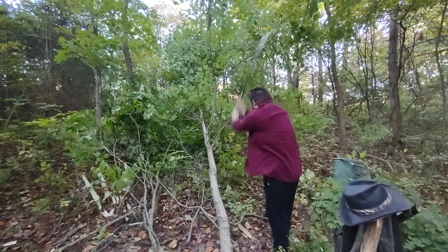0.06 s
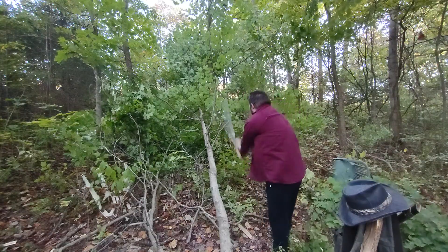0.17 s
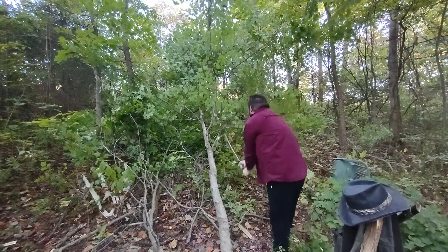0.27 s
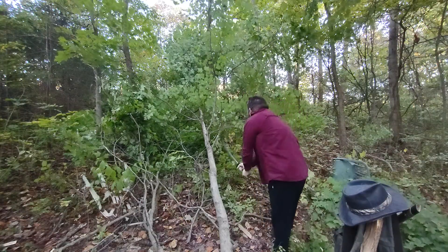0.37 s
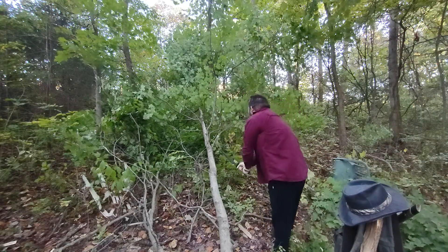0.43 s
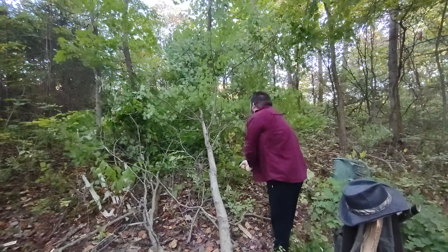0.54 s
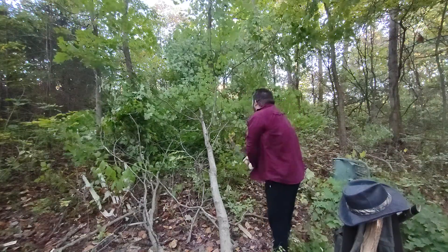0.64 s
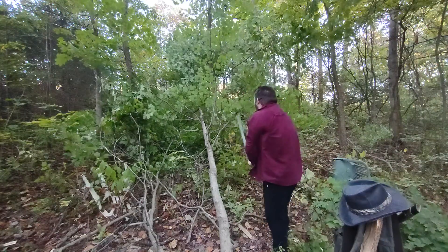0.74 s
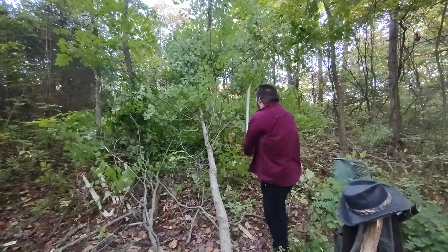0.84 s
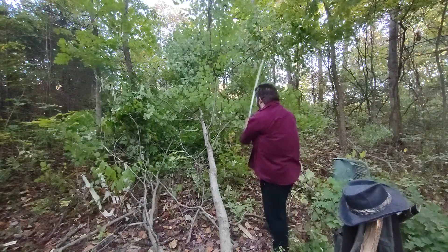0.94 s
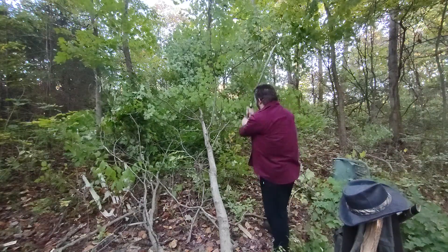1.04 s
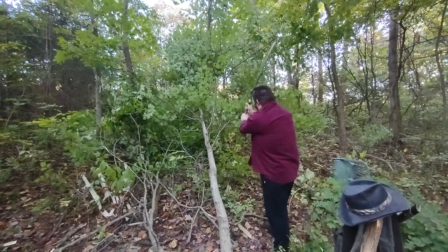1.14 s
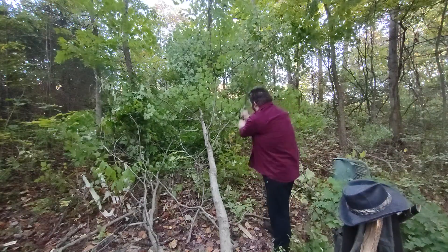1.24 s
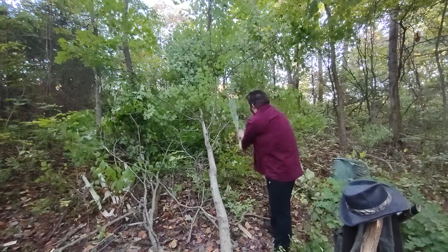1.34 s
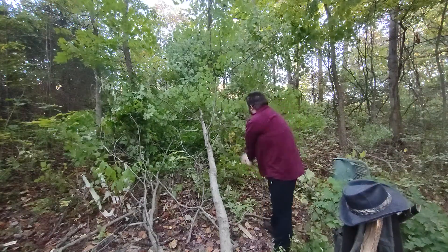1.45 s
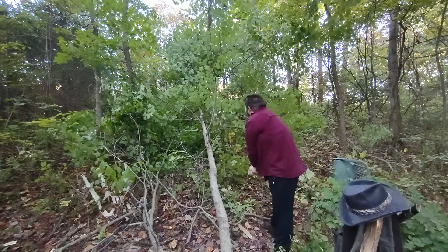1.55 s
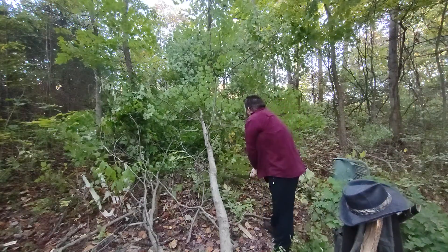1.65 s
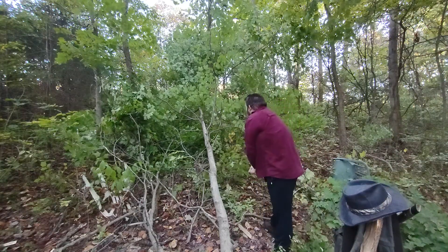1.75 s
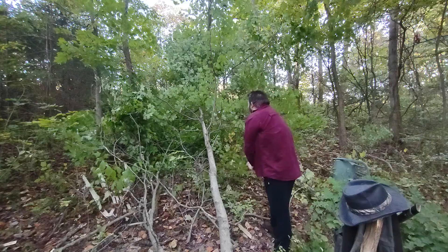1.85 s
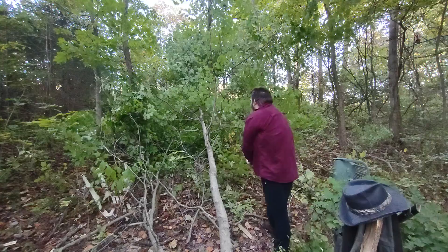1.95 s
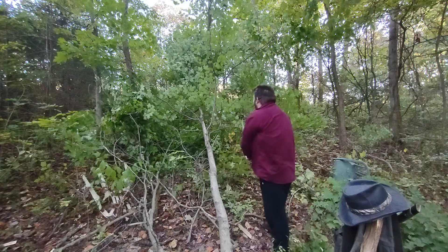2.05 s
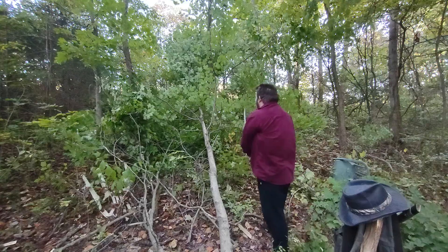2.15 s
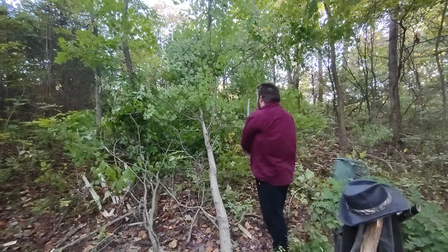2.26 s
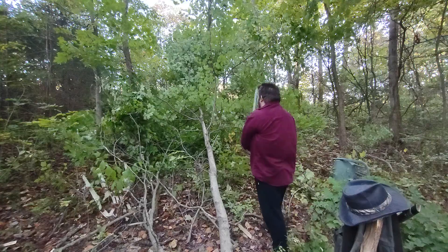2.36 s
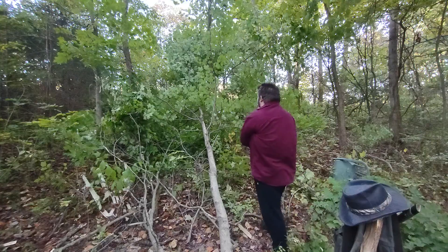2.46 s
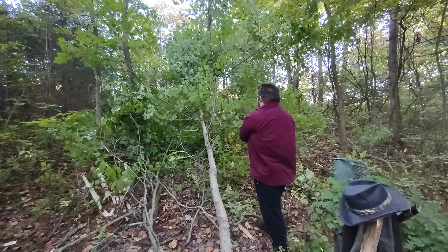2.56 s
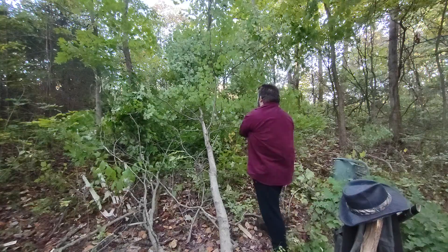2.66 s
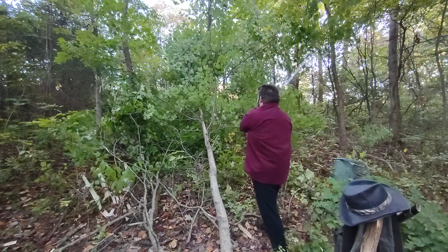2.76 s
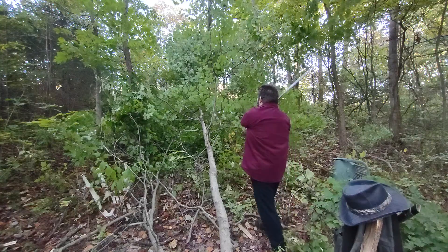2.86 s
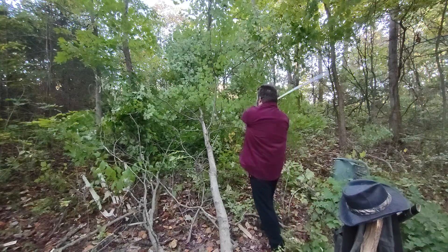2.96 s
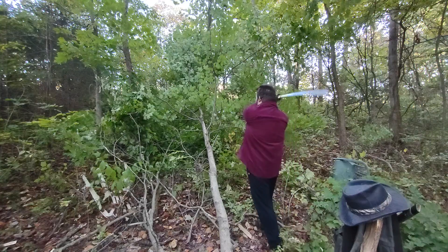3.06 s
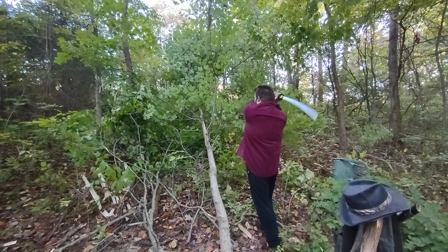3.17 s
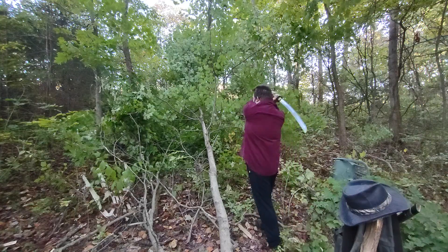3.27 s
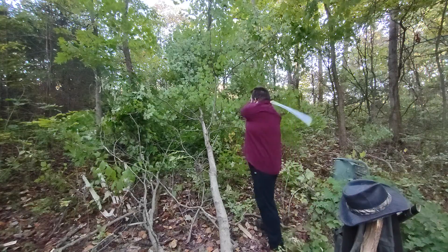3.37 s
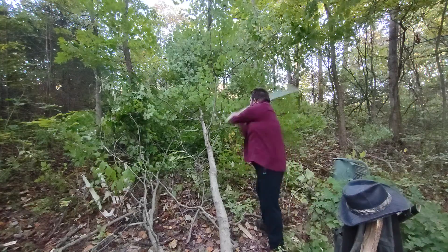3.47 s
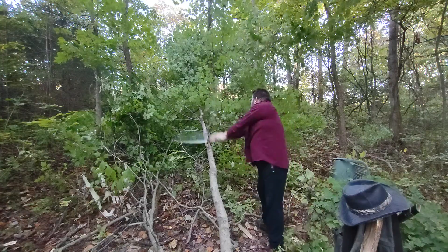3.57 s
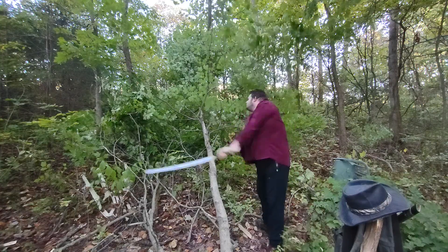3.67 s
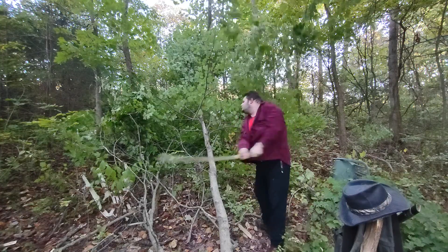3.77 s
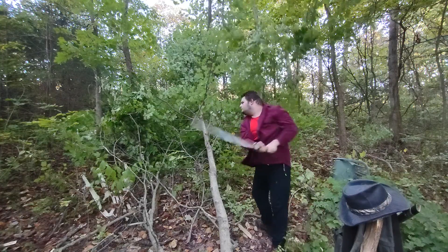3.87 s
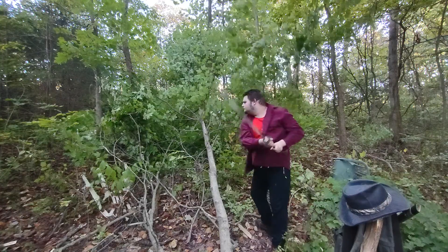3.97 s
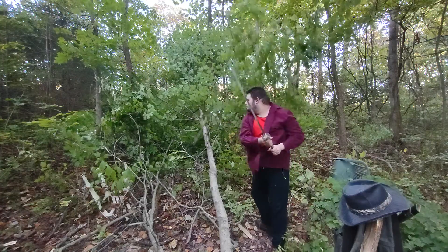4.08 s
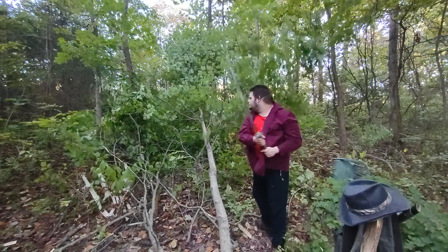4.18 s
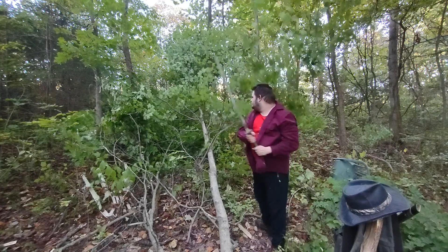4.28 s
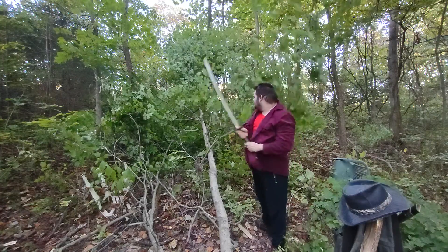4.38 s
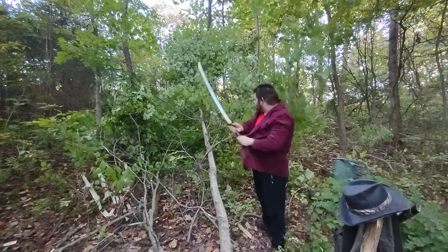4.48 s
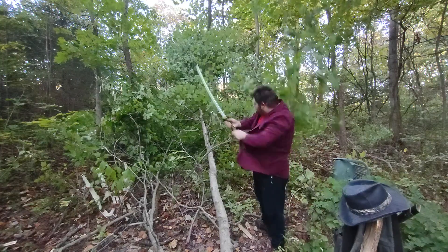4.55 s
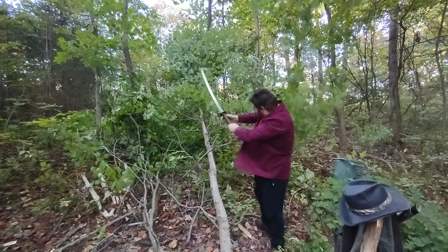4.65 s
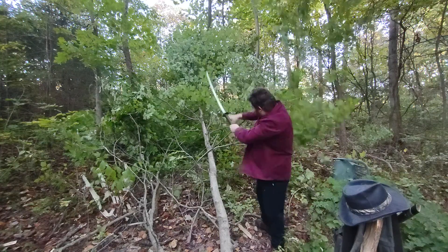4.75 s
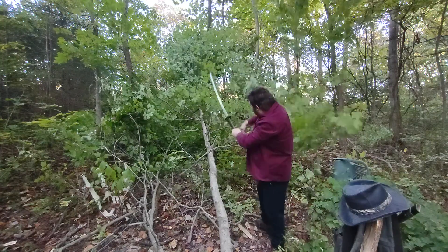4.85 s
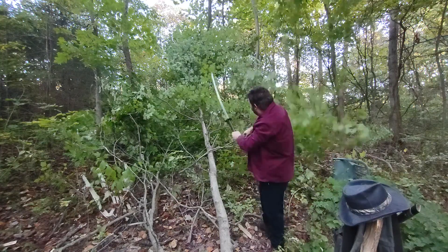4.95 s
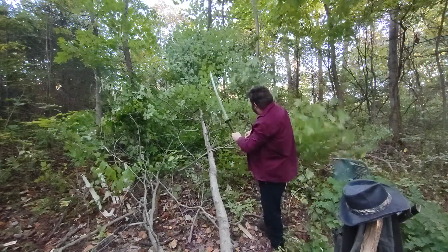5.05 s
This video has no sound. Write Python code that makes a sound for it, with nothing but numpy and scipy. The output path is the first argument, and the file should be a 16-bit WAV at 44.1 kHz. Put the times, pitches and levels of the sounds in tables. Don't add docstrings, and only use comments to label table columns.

```python
import sys
import numpy as np
from scipy import signal
from scipy.fft import rfft, irfft, next_fast_len
from scipy.io import wavfile
from scipy.ndimage import uniform_filter1d, map_coordinates

SR = 44100
rng = np.random.default_rng(int(sys.argv[2]) if len(sys.argv) > 2 else 0)


def gain_from_db(level_db):
    decades = np.asarray(level_db, float) / 20
    return 10 ** decades


def dump(signal):
    limited = np.clip(np.atleast_2d(signal).T, -1, 1)
    pcm = np.round(limited * 32767).astype(np.int16)
    wavfile.write(sys.argv[1], SR, pcm)


N = 225563


def unit(x):
    return x / np.sqrt(np.mean(x ** 2) + 1e-20)


def peak(x):
    return x / np.abs(x).max()


def along(points, hz):
    f, v = np.transpose(points)
    return np.interp(np.log(hz + 1), np.log(f + 1), v)


def curves(rows):
    s, *cols = np.transpose(rows)
    return [np.interp(np.arange(N) / SR, s, c) for c in cols]


def gate(rows, fade):
    first, last = rows[0][0], rows[-1][0]
    return np.interp(np.arange(N) / SR, [first - fade, first, last, last + fade], [0, 1, 1, 0])


def wobble(rate):
    knots = rng.standard_normal(int(N * rate / SR) + 4)
    return map_coordinates(knots, [np.arange(N) * rate / SR])


def filtered(x, response):
    m = next_fast_len(x.shape[-1] + 8192)
    spectrum = rfft(x, m) * response(np.fft.rfftfreq(m, 1 / SR))
    return irfft(spectrum, m)[..., :x.shape[-1]]


def spread(pair, alike, spectrum=((1, 0), (2, 0))):
    turn = lambda hz: np.arccos(np.clip(along(alike, hz), -1, 1)) / 2
    mid, side = filtered(pair, lambda hz: gain_from_db(along(spectrum, hz)) * [np.cos(turn(hz)), np.sin(turn(hz))])
    return np.array([mid + side, mid - side])


def add(track, s, sound):
    part = track[..., round(s * SR):][..., :sound.shape[-1]]
    part += sound[..., :part.shape[-1]]


def modes(table, luck_db):
    luck = rng.normal(0, luck_db, len(table))
    return lambda f: sum(gain_from_db(g + k) * 1j * f * w / (c * c - f * f + 1j * f * w) for k, (c, w, g) in zip(luck, table))


def narrow(hz, width_hz, share=1):
    turning = 2 * np.pi * np.cumsum(hz * np.ones(N)) / SR
    line = lambda: wobble(width_hz) * np.cos(turning) + wobble(width_hz) * np.sin(turning)
    pair = share * np.array([line(), line()])
    return unit(pair) * np.sqrt(np.mean(share ** 2))


def steady(hz, drift_hz, swell_db, rate):
    turning = 2 * np.pi * np.cumsum(hz + drift_hz * wobble(rate)) / SR
    return np.sqrt(2) * gain_from_db(swell_db * wobble(rate)) * np.sin(turning)


# [pitch_hz, likeness (-1 to 1)]
NEAR_LIKENESS = [(60, 0.77), (180, 0.68), (550, 0.92), (1650, 0.99), (4970, 0.27), (15000, -.3)]


def glide(rows, fade, width_hz):
    hz, level_db = curves(rows)
    return gain_from_db(level_db) * spread(narrow(hz, width_hz, gate(rows, fade)), NEAR_LIKENESS)


# [pitch_hz, likeness (-1 to 1)]
FAR_LIKENESS = [(60, 0.83), (240, 0.99), (950, -1), (3770, -0.04), (15000, 0.21)]
# [pitch_hz, level_db]
AIR_COLOUR = [(15, -43.5), (25, -13), (102, 2.5), (200, -9.5), (677, -10), (911, -13), (1040, -14),
              (2220, -12.5), (2480, -13.5), (3820, -15.5), (5140, -17.5), (14800, -29), (16000, -25)]
# [time_s, level_db]
ENGINE_LOW = [(0, -90), (.5, -76), (1.0, -73), (1.45, -69), (2.0, -72), (2.6, -74), (3.1, -73), (3.4, -82),
              (4.0, -70), (5.11, -71)]
# [time_s, level_db]
ENGINE_HIGH = [(0, -95), (.8, -86), (1.2, -77), (2.2, -77), (2.7, -75), (3.45, -76), (3.6, -86), (4.1, -73),
               (5.11, -72)]


def air():
    hiss = unit(spread(rng.standard_normal((2, N)), FAR_LIKENESS, AIR_COLOUR))
    hiss = gain_from_db(-71.1 + .8 * wobble(7.3)) * hiss
    low = steady(84, drift_hz=4, swell_db=1.5, rate=9) + gain_from_db(-9) * narrow(84, width_hz=20)
    high = steady(128, drift_hz=4, swell_db=2.5, rate=9) * np.array([[1], [.4]])
    high = high + gain_from_db(-7) * narrow(128, width_hz=20)
    return hiss + gain_from_db(curves(ENGINE_LOW)[0]) * low + gain_from_db(curves(ENGINE_HIGH)[0]) * high


# [start_s, length_s, first pitch_hz, level_db, gain through the call_db]
BIRD_CALLS = [
    (1.38, .2, 3330, -78, 12),
    (2.89, .43, 3390, -76.5, -6),
]


def bird():
    fall_hz, edge_db = 140, -8
    share, edge = np.transpose([(0, edge_db), (.2, 0), (.8, 0), (1, edge_db)])
    out = 0
    for s, length, hz, db, gain_db in BIRD_CALLS:
        level = db + edge + gain_db * (share - .5)
        rows = np.transpose([s + length * share, hz - fall_hz * share, level])
        pitch, level_db = curves(rows)
        clear = gate(rows, .03) * gain_from_db(level_db) * steady(pitch, drift_hz=25, swell_db=4.5, rate=60)
        out = out + clear + gain_from_db(-1) * glide(rows, .03, width_hz=260)
    return out


# [pitch_hz, time to fade 60 dB_s]
TRUNK_ECHO = [(300, 0.42), (2000, 0.39), (10000, .3)]


def trees(x):
    hz, t, z = signal.stft(rng.standard_normal((2, SR // 2)), SR, nperseg=256)
    tail = signal.istft(z * gain_from_db(-60 * t / along(TRUNK_ECHO, hz)[:, None]), SR, nperseg=256)[1]
    late = np.pad(x, ((0, 0), (300, 0)))
    return signal.fftconvolve(late, tail / np.linalg.norm(tail[0]), axes=1)[:, :N]


def crackle(per_s, scatter_db, life_s, patchy_db):
    size = (rng.random(N) < per_s / SR) * gain_from_db(scatter_db * np.clip(rng.exponential(size=N), 0, 2.5))
    flare = 1 + signal.fftconvolve(size, np.exp(-np.arange(800) / SR / life_s))[:N]
    z = signal.stft(flare * rng.standard_normal((2, N)), nperseg=256)[2]
    field = uniform_filter1d(rng.standard_normal(z.shape[1:]), size=5, axis=0)
    field = uniform_filter1d(field, size=12, axis=1)
    return signal.istft(z * gain_from_db(patchy_db * unit(field)), nperseg=256)[1][:, :N]


# [pitch_hz, likeness (-1 to 1)]
WIDE_LIKENESS = [(60, 0.42), (180, 0.18), (550, 0.23), (1650, 0.048), (4970, 0.044), (15000, 0.01)]
# [time_s, level_db]
SHOWER_LEVEL = [(4.2, -68), (4.31, -59), (4.39, -60), (4.46, -51), (4.49, -53), (4.555, -49.5), (4.59, -52),
                (4.603, -46), (4.625, -53), (4.68, -54), (4.715, -59), (4.8, -58.5), (4.87, -59),
                (4.92, -68), (5.0, -55), (5.03, -56), (5.11, -62)]
# [pitch_hz, level per Hz_db]
DRY_LEAF_COLOUR = [(6300, -120), (7500, -12), (8300, -1), (10000, -2), (11300, -7), (12500, -4), (13500, 0),
                   (16500, 1)]


def shower():
    wash = crackle(400, scatter_db=1, life_s=.001, patchy_db=1.5)
    wash = unit(spread(wash, WIDE_LIKENESS, DRY_LEAF_COLOUR))
    return gate(SHOWER_LEVEL, .05) * gain_from_db(curves(SHOWER_LEVEL)[0]) * wash


# [start_s, level_db, time to lose 20 dB_s, brightness_db, twig rattle_db]
SHAKES = [
    (0.342, -33, 0.13, -2.5, -13),
    (1.562, -31, 0.13, -5, -4),
    (1.629, -30, 0.12, -7, -20),
    (1.782, -43, 0.09, -3, -15),
    (1.806, -38, .075, -5, -9),
    (3.686, -31.5, 0.135, -4.5, -14),
]
SETTLE_DB = [-20, -25, -25, -25, -25, -19]
SING_DB = [-10, -9, -8, -13, -13, -13]
# [loudest_s, level_db, time to gain 20 dB_s, time to lose it_s, brightness_db]
STIRS = [(.03, -66.5, 0.5, 0.23, -9), (.26, -71, 0.3, 0.4, -9), (1.125, -60, 0.3, 0.14, -9),
         (1.38, -76, 0.7, .2, -9), (.338, -54, .016, .02, -9), (1.559, -53, .012, .02, -9),
         (1.73, -50, .08, .1, -3), (1.92, -58, .1, .1, -5), (1.99, -59.5, 0.06, 0.2, -7),
         (2.2, -70.5, 0.2, .4, -12), (2.42, -68, .3, .2, -12), (2.6, -68, 0.14, .4, -9),
         (2.72, -59.5, 0.13, 0.075, -9), (2.89, -64.5, 0.07, .13, -9), (3.09, -71.5, 0.03, 0.21, -9),
         (3.33, -77, .5, .3, -9), (3.672, -60, 0.08, .05, -20), (3.84, -55, .12, .13, -1),
         (4.865, -56, .06, .04, -7), (4.98, -55, .08, .1, -12), (5.025, -58, .08, .06, -5)]
# [start_s, level_db, time to lose 20 dB_s, brightness_db]
SWEEPS = [(4.285, -43, .07, -11), (4.312, -45, .06, -13), (4.335, -46, .05, -13), (4.395, -49, .04, -8),
          (4.432, -48, .05, -7), (4.455, -45, .06, -12), (4.515, -43, .06, -9), (4.545, -46, .07, -9),
          (4.6, -52, .045, -4), (4.662, -48, .06, -10), (4.733, -51, .045, -13), (5.098, -47, .04, -13)]
# [time_s, level_db, brightness_db, hollowness_db]
FALL = [(3.8, -60, -9, -4), (3.98, -61, -13, -6), (4.12, -60, -14, -4), (4.26, -54, -11, -3),
        (4.4, -51, -9, -6), (4.5, -47, -7, -12), (4.62, -50.5, -6, -10), (4.76, -54, -8, -4),
        (4.85, -56, -6, -5), (4.92, -58, -12, -1), (5.11, -57, -8, -3)]


def shaking():
    fall_rattle_db, silent = -4, -np.inf
    t = np.arange(N) / SR
    # power, brightness dB, rattle dB, hollowness dB, blade dB; the first is the calm between blows
    parts = [(np.full(N, gain_from_db(2 * -79.5)), -9, -3.5, 0, silent)]
    for (s, db, length, bright_db, rattle_db), settle_db, sing_db in zip(SHAKES, SETTLE_DB, SING_DB):
        u = np.clip(t - s, 0, None)
        rise = (1 - np.exp(-u / .0055)) ** 2
        shake = rise * gain_from_db(2 * (db - 20 * (u / length) ** 1.36))
        settle = rise * gain_from_db(2 * (db + settle_db - 60 * u / 1.4))
        parts += [(shake, bright_db, rattle_db, 0, sing_db), (settle, -11, -6, 0, silent)]
    for s, db, rise, fall, bright_db in STIRS:
        loss_db = 20 * np.maximum((s - t) / rise, (t - s) / fall)
        parts.append((gain_from_db(2 * (db - loss_db)), bright_db, -6.5, 0, silent))
    for s, db, length, bright_db in SWEEPS:
        u = np.clip(t - s, 0, None)
        power = (1 - np.exp(-u / .01)) ** 2 * gain_from_db(2 * (db - 20 * u / length))
        parts.append((power, bright_db, fall_rattle_db, -8, silent))
    shares = gain_from_db(2 * np.array([(0, *part[1:]) for part in parts]))
    mix = shares.T @ np.array([part[0] for part in parts])
    fall_db, bright_db, hollow_db = curves(FALL)
    offsets_db = np.array([0 * fall_db, bright_db, 0 * fall_db + fall_rattle_db, hollow_db])
    mix[:-1] += gate(FALL, .05) * gain_from_db(2 * (fall_db + offsets_db))
    return np.sqrt(mix)


def flicks(count, centre_hz, cycles):
    when, pitch, size, side = rng.random((count, 4)).T
    hz = (centre_hz * 2 ** (2.2 * (pitch - .5)))[:, None]
    t = np.arange(256) / SR
    tones = gain_from_db(15 * size[:, None] ** 3) * np.exp(-t * hz / cycles) * np.sin(2 * np.pi * hz * t)
    where = ((when * N).astype(int)[:, None] + np.arange(256)).ravel()
    channel = lambda gain: np.bincount(where, (tones * gain[:, None]).ravel(), N + 256)[:N]
    return unit(np.array([channel(side), channel(1 - side)]))


# [pitch_hz, width_hz, level_db]
STEEL_TONES = [(3202, 54, -1), (4250, 73, -9), (4570, 100, -11), (5470, 51, -4.5), (5660, 60, -4),
               (6140, 90, -9), (8530, 30, -12.5), (10240, 290, -10), (11620, 80, -12)]


def blade_modes(lowest_db):
    changed = [(*tone[:2], db) for tone, db in zip(STEEL_TONES, lowest_db)]
    return modes(changed + STEEL_TONES[len(changed):], luck_db=1.5)


# [pitch_hz, level_db]
LEAF_COLOUR = [(710, -45), (1200, -18), (1970, 0.5), (3090, 5.5), (4040, 5.5), (4950, 1.5), (6000, 1.5),
               (7520, -5), (8280, -2.5), (10400, -8), (11500, -13), (13500, -14), (15600, -11.5)]
# [pitch_hz, level_db]
RATTLE_COLOUR = [(35, -39.5), (60, -5.5), (129, -3.5), (188, -10), (435, -7), (550, -9), (1020, -6),
                 (2000, -9), (2600, -31.5), (4400, -120)]
# [pitch_hz, likeness (-1 to 1)]
TWIG_LIKENESS = [(60, 0.49), (380, 0.57), (2380, 0.036), (15000, 0.17)]


def leaves():
    level, bright, low, middle, blade = shaking()
    shake = .9 * wobble(35)
    hiss = crackle(110, scatter_db=-3.5, life_s=.0012, patchy_db=1.5)
    hiss = unit(spread(hiss, WIDE_LIKENESS, LEAF_COLOUR))
    above = lambda edge_hz: filtered(hiss, lambda hz: 1 / (1 + (edge_hz / (hz + 1)) ** 8))
    upper, rest = above(7500), above(5900)
    rattle = crackle(110, scatter_db=1.5, life_s=.003, patchy_db=1.5)
    rattle = unit(spread(rattle, TWIG_LIKENESS, RATTLE_COLOUR))
    single = gain_from_db(-11) * flicks(count=2000, centre_hz=4200, cycles=4.5)
    sung = blade_modes([-11])
    steel = blade * gain_from_db(3 * wobble(70)) * unit(filtered(hiss, lambda hz: hz * sung(hz)))
    green = level * (hiss - rest + single) + middle * (rest - upper)
    return steel + gain_from_db(shake) * (green + gain_from_db(14) * bright * upper + gain_from_db(2.1) * low * rattle)


# [start_s, peak level_db, pitch_hz, breadth_db]
TWIG_SNAPS = [(0.2278, -51, 7590, 4), (1.1218, -46, 2000, 14), (1.149, -60, 5100, 0),
              (1.285, -60.5, 2680, 0), (1.3453, -53, 2680, 8), (1.379, -58, 3310, 8),
              (1.4928, -44, 5720, -12), (1.774, -34, 6500, 0), (1.7848, -38, 3030, -12),
              (1.978, -38.5, 2800, 9), (2.0228, -43, 3330, -8), (2.0374, -44.5, 3650, 7),
              (2.0925, -35.5, 2500, 4), (2.203, -43.5, 3990, -11), (2.235, -54.5, 3340, -14),
              (2.2734, -53, 3070, -4), (2.4024, -38, 3400, -4), (2.401, -50, 750, -10),
              (2.4708, -46.5, 3080, -12), (2.5308, -56, 3170, 0), (2.707, -46, 3250, 5),
              (2.833, -53.5, 3780, 0), (2.8802, -42, 3010, 4), (2.881, -46, 7500, 4),
              (2.944, -54.5, 3300, -3), (3.094, -51, 3150, 3), (3.217, -47, 1300, 8),
              (3.2864, -58, 3330, 10), (1.928, -52, 3000, 6), (2.092, -44, 9000, -6),
              (1.977, -41, 12500, -6), (2.0764, -50, 3540, -10), (2.148, -55, 6000, -6),
              (2.176, -57, 4000, -10), (2.29, -60, 3900, 0), (2.3094, -57, 3090, -4), (3.14, -60, 2200, 0),
              (3.172, -60, 3800, -6), (3.333, -61, 9000, 4), (3.447, -61, 9500, 2), (3.492, -62, 5000, 0),
              (3.606, -61, 4500, -6)]
# [start_s, peak level_db, pitch_hz, breadth_db]
FALL_SNAPS = [(4.0402, -51, 4300, 4), (4.2438, -44, 2000, -5), (4.2946, -41, 2430, 0),
              (4.4094, -40, 4040, 2), (4.4597, -38, 2220, -3), (4.6004, -38, 13000, -4),
              (4.618, -39, 4200, -4), (4.6692, -40, 3270, 0), (4.7328, -43, 5200, -8),
              (4.995, -42, 13000, -4), (5.0183, -42, 13000, 0), (5.035, -44, 12500, -4),
              (5.1006, -39, 2240, 9)]


def twigs():
    out, t = np.zeros((2, N)), np.arange(SR // 16) / SR
    fade = gain_from_db(-60 * t / .018) + .15 * gain_from_db(-60 * t / .07)
    for s, db, hz, breadth_db in TWIG_SNAPS + FALL_SNAPS:
        dull_db, spit_db = -18.5 + .6 * breadth_db, -15.5 + breadth_db
        pan_db = 3 * rng.normal()
        colour = [(300, dull_db - 9.5), (900, dull_db + 7.5), (hz * .7, -6), (hz, 0), (hz * 1.3, -6),
                  (11000, spit_db - 2.5), (20000, spit_db - 12)]
        snap = fade * spread(rng.standard_normal((2, len(t))), NEAR_LIKENESS, sorted(colour))
        add(out, s - .0005, gain_from_db(db + pan_db * np.array([[.5], [-.5]])) * .058 * unit(snap))
    return out


def bending(events, sag, rise_cycles, pan_db):
    out, t = np.zeros((2, N)), np.arange(SR // 3) / SR
    for (s, db, hz, t60), side_db in zip(events, np.broadcast_to(pan_db, len(events))):
        turns = hz * np.cumsum(1 - sag + 1.428 * sag * np.exp(-t * hz / 4.1)) / SR
        shape = gain_from_db(-60 * t / t60) * (1 - np.exp(-t * hz / rise_cycles)) * np.sin(2 * np.pi * turns)
        add(out, s + .26 / hz, gain_from_db(db + side_db * np.array([[.5], [-.5]])) * peak(shape))
    return out


# [start_s, peak level_db, pitch_hz, time to
# fade 60 dB_s]
RINGING_TOCKS = [(1.977, -55, 1840, .04), (1.977, -53, 2900, .025), (2.002, -59, 3100, .025),
                 (2.04, -63, 920, .06), (2.093, -57, 4300, .03), (2.202, -58, 3450, .03),
                 (2.202, -57, 4050, .035), (2.235, -64, 4100, .03), (2.235, -63, 3400, .025),
                 (1.817, -41, 3000, .02), (1.694, -39, 5600, .02), (4.617, -40, 3080, .018),
                 (.3415, -20, 4250, .025), (.42, -33, 4500, .04), (1.6265, -17, 3200, .09),
                 (1.6375, -23, 3200, .06), (1.632, -24, 5650, .04), (1.638, -23, 5900, .04),
                 (1.586, -31, 5300, .05), (1.596, -33, 5250, .05), (1.579, -31, 6100, .04),
                 (1.606, -32, 3200, .1), (1.618, -31, 3200, .05), (1.627, -24, 2300, .02),
                 (1.564, -26, 4900, .02), (1.59, -26, 3200, .025), (1.803, -36, 2500, .02),
                 (2.05, -60, 800, .05), (2.203, -60, 2100, .03), (2.077, -56, 3600, .02),
                 (2.149, -63, 5400, .02), (2.402, -53, 3300, .03), (3.688, -24, 3300, .06)]


def tocks():
    return bending(RINGING_TOCKS, sag=.02, rise_cycles=1.5, pan_db=-1.5)


# [start_s, peak level_db, pitch_hz, time to fade 60 dB_s]
GROUND_THUDS = [(0.344, -40.5, 88, 0.15), (1.562, -36.5, 86, 0.087), (1.625, -40.5, 110.5, 0.066),
                (1.8, -57, 150, 0.1), (3.69, -47, 105, 0.17), (1.85, -56, 165, .1), (4.386, -46, 121, 0.14),
                (4.623, -45.5, 136, 0.11)]
THUD_SIDE_DB = [-3, -4, 3, 2, 0, 2, 3, 3]


def thuds():
    return bending(GROUND_THUDS, sag=.2, rise_cycles=.9, pan_db=THUD_SIDE_DB)


# [start_s, peak level_db, pitch_hz, time to fade 60 dB_s]
STEM_KNOCKS = [(0.3385, -21.5, 820, 0.045), (0.3415, -18, 1000, 0.03), (0.346, -27, 827, 0.027),
               (0.361, -29, 560, 0.05), (.338, -28, 1900, .01), (1.559, -27, 900, 0.02),
               (1.658, -37, 1000, .03), (1.565, -31.5, 1004, 0.037), (1.587, -33, 991, 0.025),
               (1.593, -28.5, 970, 0.02), (1.619, -26.5, 834, 0.011), (1.626, -28.5, 975, 0.024),
               (1.803, -41.5, 704, 0.016), (3.68, -25, 1480, 0.026), (3.678, -25, 800, .02),
               (3.678, -20.5, 2100, 0.018), (3.685, -18, 806, 0.006), (3.69, -27, 793, 0.02),
               (3.696, -32, 420, 0.06), (4.312, -37, 1200, 0.025), (4.334, -43, 1400, .03),
               (4.386, -25, 644, 0.011), (4.393, -38, 420, 0.06), (4.435, -36, 590, 0.014),
               (4.518, -44, 1080, 0.039), (5.021, -52, 990, 0.033)]


def knocks():
    sound = bending(STEM_KNOCKS, sag=.36, rise_cycles=.59, pan_db=.8)
    return filtered(sound, lambda hz: (1j * hz / (260 + 1j * hz)) ** 2)


# [start_s, blow_s, pitch at the blow_hz, level_db, width_hz]
SWINGS = [
    (.19, 0.339, 860, -73, 260),
    (3.61, 3.678, 950, -57, 480),
]


def swish():
    speed_up_hz_per_s = 4300
    out = 0
    for start, blow, hz, db, width_hz in SWINGS:
        s = np.array([start, start + .4 * (blow - start), blow])
        level_db = db - 24 * (s == start)
        out = out + glide(np.transpose([s, hz - speed_up_hz_per_s * (blow - s), level_db]), .009, width_hz)
    return out


# [start_s, peak level_db, blade ring_db, stem_db, time to lose 20 dB_s]
BITES = [(0.3415, -13, -12, -6, 0.023), (0.343, -35, -4, -14, 0.011), (0.3461, -18, -13.5, -6.5, 0.0099),
         (0.355, -24, 6, -11.5, 0.008), (0.3634, -19, -5.5, -14.5, 0.022), (0.4165, -31, -2, -30, 0.012),
         (1.562, -16, -11, -15, 0.0094), (1.572, -28, -7, -21, 0.012), (1.586, -17, -7.5, -22, 0.011),
         (1.5916, -23.5, -8, -15, 0.011), (1.6275, -12, -6, -10.5, 0.0075), (1.6327, -12, -12.5, -34, 0.02),
         (1.6407, -19, -6, -32, 0.023), (1.8038, -19, -12, -20, 0.004), (1.8485, -28, -12, -32, 0.004),
         (3.681, -34.5, -3, 7, 0.0084), (3.6819, -10.5, -12, 0, 0.0072), (3.6869, -13, -2.5, -7.5, 0.019),
         (3.6922, -24, -1, -11, 0.013)]
NEXT_STEM_S = [1, 3]
BITE_RISE_S = [.0012, .001, .002]
# [pitch_hz, level per Hz_db]
SPLIT_COLOUR = [
    [(820, -41.5), (1400, -10.5), (2250, -13.5), (4280, 2.5), (4830, -3), (15500, -19.5)],
    [(820, -39.5), (1400, -18), (1990, -20.5), (3260, -6.5), (3530, -11.5), (15500, -20)],
    [(820, -62), (1400, -20), (2320, -11.5), (3290, 0), (3910, -1), (15500, -23.5)],
]
# [pitch_hz, width_hz, level_db]
STEM_TONES = [
    [(373, 37, -1), (640, 64, -1), (920, 62, 2), (1340, 77, -15.5), (2172, 37, -14)],
    [(931, 65, 2), (1100, 22, -10.5), (1480, 71, -13), (1760, 110.1, -14.5)],
    [(660, 52, -10), (790, 100, -2.5), (1130, 44, -12), (1300, 71, -6.5), (2000, 155, -5)],
]
# [lowest_db, next_db]
LOW_TONES_DB = [(-13, -2), (0, -7), (2, -3)]


def bites():
    out, t = np.zeros((2, N)), np.arange(SR // 8) / SR
    for s, db, ring_db, wood_db, length in BITES:
        stem = np.searchsorted(NEXT_STEM_S, s)
        force = gain_from_db(-20 * t / length) * (1 - np.exp(-t / BITE_RISE_S[stem]))
        split = force * spread(rng.standard_normal((2, len(t))), NEAR_LIKENESS, SPLIT_COLOUR[stem])
        drive = force * spread(rng.standard_normal((2, len(t))), NEAR_LIKENESS)
        ring = filtered(drive, blade_modes(LOW_TONES_DB[stem]))
        wood = filtered(drive, modes(STEM_TONES[stem], luck_db=2.0))
        bite = peak(split) + gain_from_db(ring_db) * peak(ring) + gain_from_db(wood_db - 1.5) * peak(wood)
        add(out, s - .001, gain_from_db(db) * bite)
    return out


def scene():
    blows = bites() + knocks() + twigs() + tocks()
    quiet = air() + bird()
    return quiet + gain_from_db(-16.5) * trees(blows) + shower() + leaves() + thuds() + swish() + blows


def band_limit(x):
    return signal.sosfilt(signal.butter(12, 16980, fs=SR, output="sos"), x)


# [pitch_hz, left minus right_db]
PORT_COLOUR = [(60, -0.5), (130, -0.5), (290, 0.5), (640, 0), (1410, 0.0), (3100, -1), (6820, -6),
               (15000, 1)]


def record(dry):
    sides = np.array([[.5], [-.5]])
    ports = lambda hz: gain_from_db(along(PORT_COLOUR, hz) * sides) * (1j * hz / (55 + 1j * hz)) ** 2
    picked = filtered(dry, ports)
    held = picked / (1 + np.abs(picked / .5) ** 3) ** (1 / 3)
    finished = filtered(held, lambda hz: 1 / (1 + (hz / 15800) ** 260))
    return band_limit(finished)


dry = scene()
out = record(dry)
dump(out)
```